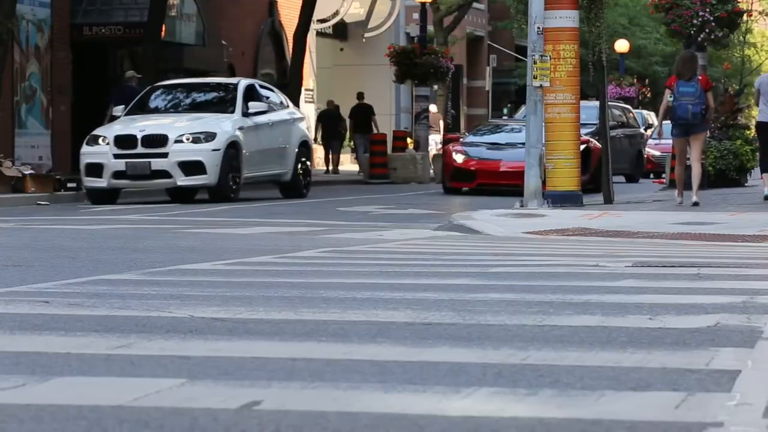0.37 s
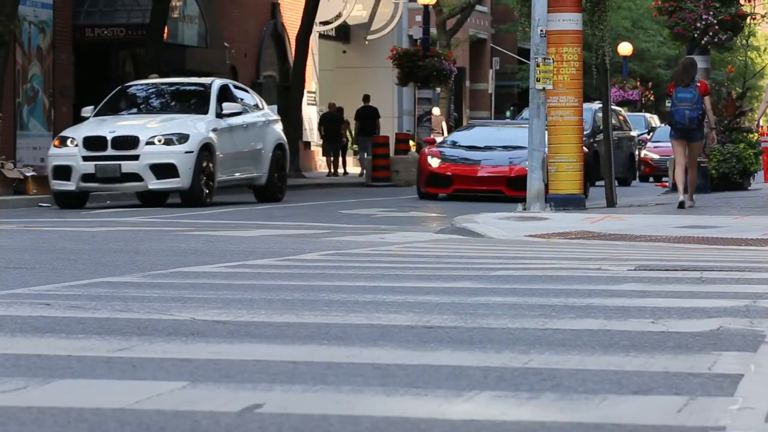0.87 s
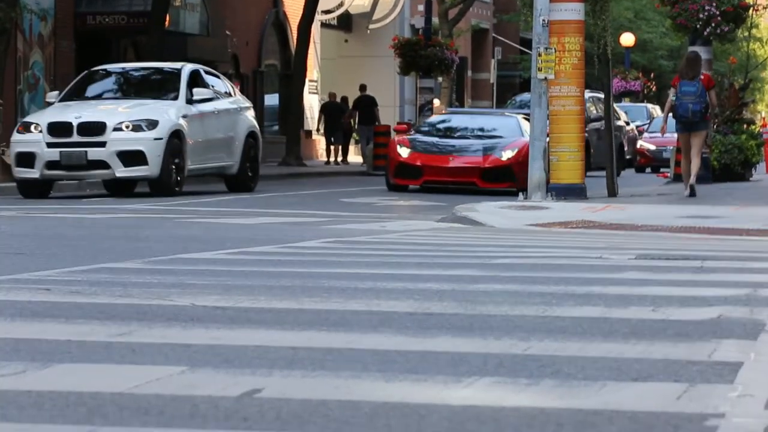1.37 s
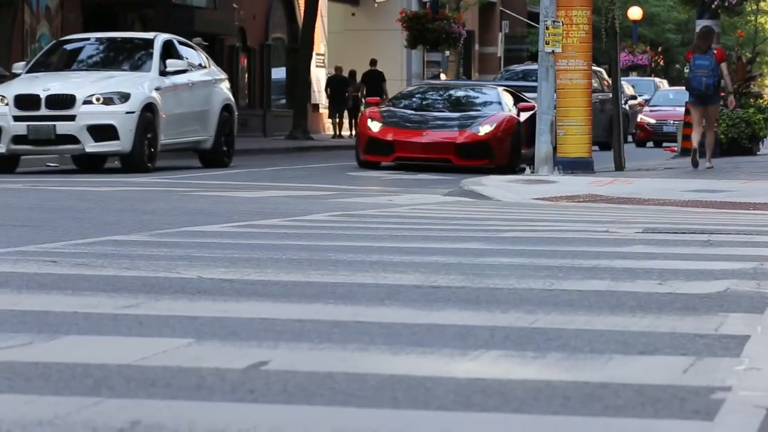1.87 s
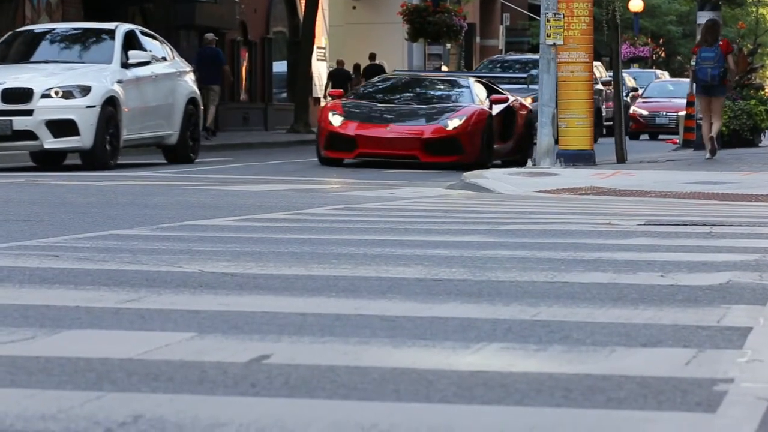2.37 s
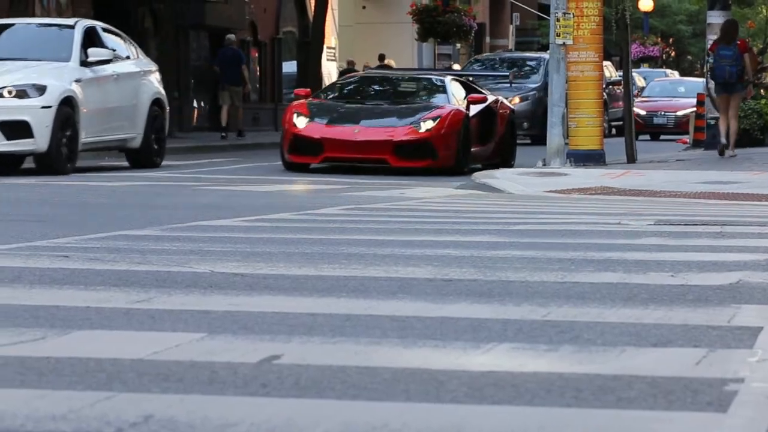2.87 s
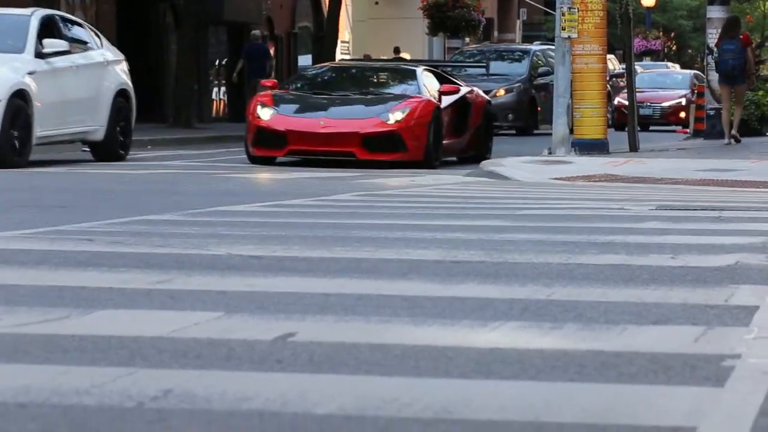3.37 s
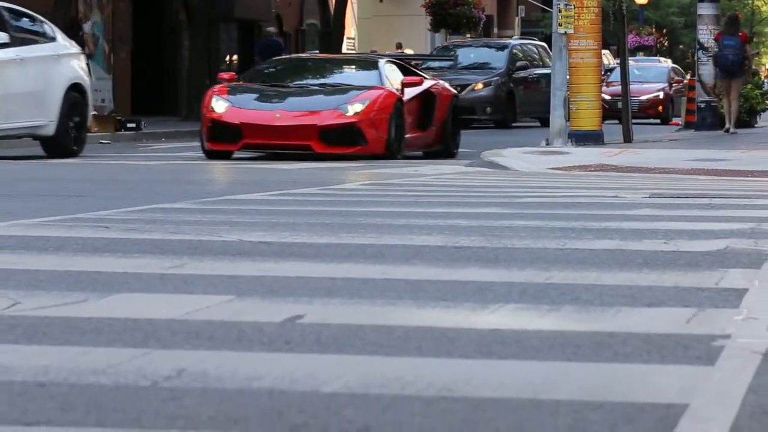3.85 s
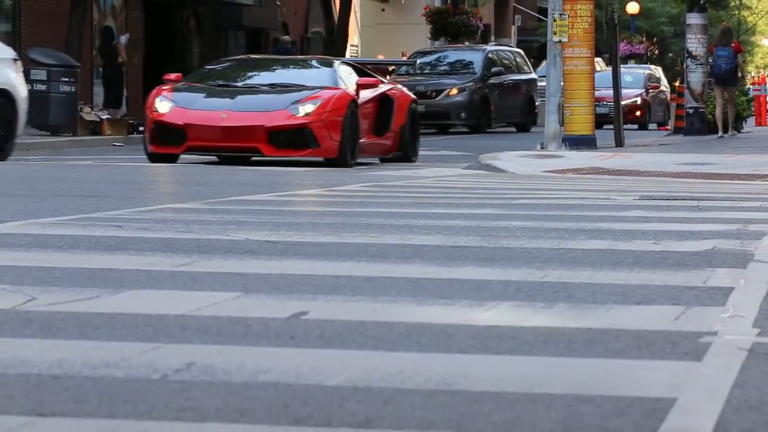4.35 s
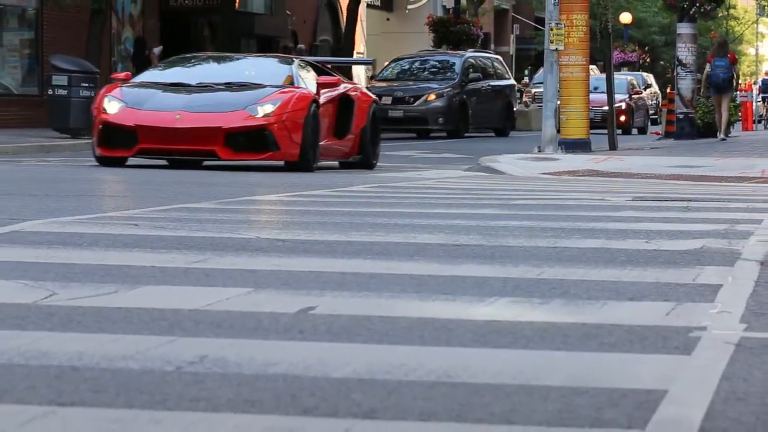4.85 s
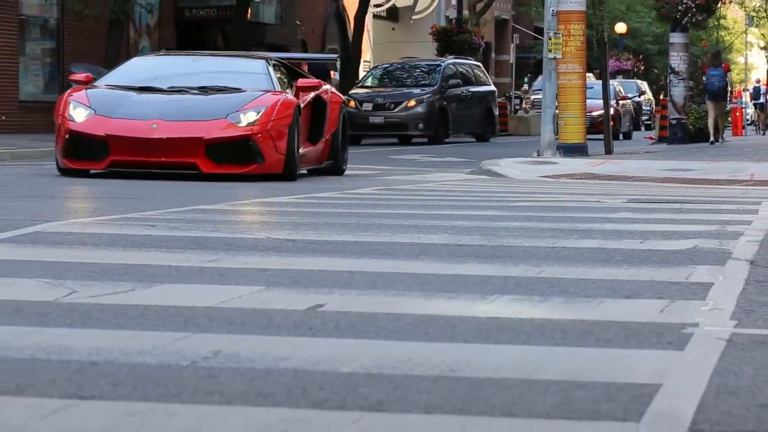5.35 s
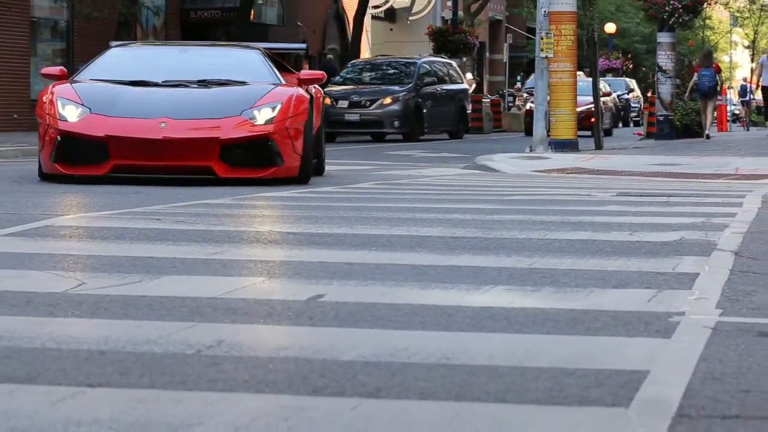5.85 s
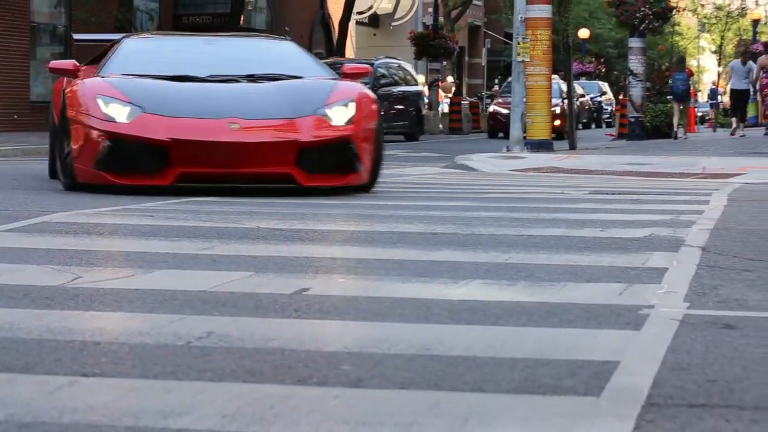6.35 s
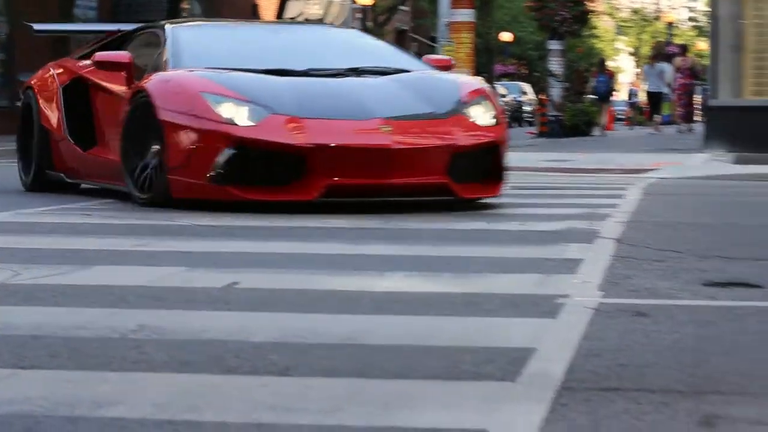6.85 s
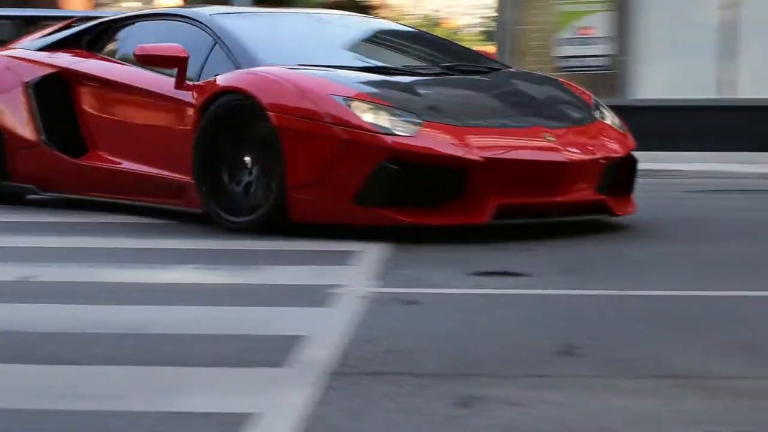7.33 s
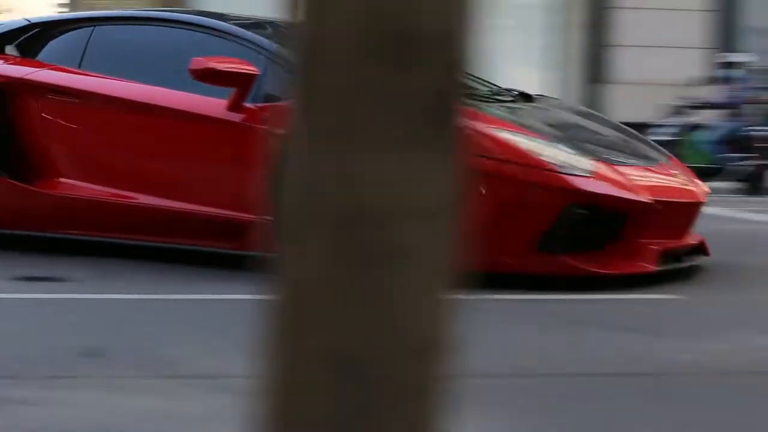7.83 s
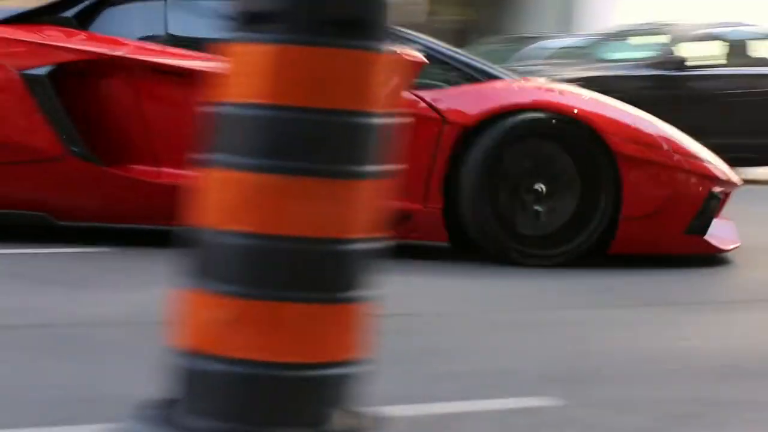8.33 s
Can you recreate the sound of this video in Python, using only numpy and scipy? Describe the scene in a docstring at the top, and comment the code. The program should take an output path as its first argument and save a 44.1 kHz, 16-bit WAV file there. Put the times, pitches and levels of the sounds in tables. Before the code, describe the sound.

A big engine approaches one outdoor microphone: a single dominant low hum with uneven, pulsing loudness, faint growling overtones and broad street roar behind. Automatic levelling pushes the street down whenever the boom swells. The note wobbles at first, sags slightly, then climbs gradually. In the last seconds upper overtones and tyre noise come forward, the boom surges, then weakens abruptly as the sound stops with no fade.

```python
"""Sports car rounding a street corner

A big engine pulls slowly towards the microphone. Sines on multiples of the firing pattern make its note:
one booms in the pipe and wavers as wall echoes add and cancel, weaker ones come and go.
Patchy coloured noise makes rumble, burble, street roar and tyre hiss; a few small ticks are damped sines.
The sound fades in, and gain control on the whole mix ducks the street when the boom swells."""
import sys
import numpy as np
from scipy import signal
from scipy.fft import rfft, irfft, next_fast_len
from scipy.io import wavfile
from scipy.ndimage import uniform_filter1d, map_coordinates

SR = 44100
rng = np.random.default_rng(int(sys.argv[2]) if len(sys.argv) > 2 else 0)


def transcribe(signal):
    """Save signal, clipped to [-1, 1], as a 16-bit WAV file at the path in sys.argv[1]."""
    frames = np.atleast_2d(signal).T
    limited = np.clip(frames, -1, 1)
    pcm = np.round(limited * 32767).astype(np.int16)
    wavfile.write(sys.argv[1], SR, pcm)


def voltage_ratio(decibels):
    """Convert decibels (scalar or array-like) to amplitude ratios, 20 dB per decade."""
    exponent = np.asarray(decibels, float) / 20
    return 10 ** exponent


N = 373086  # length in samples

# The engine's pull. Each row: time in seconds, firing pattern rate in Hz.
FIRING_RATE = [(.3, 41.3), (.6, 42.53), (.9, 44.1), (1.25, 44.4), (1.5, 43.45), (1.75, 44.6), (2, 43.09),
               (2.5, 42.36), (2.9, 41.95), (3.15, 42.61), (3.45, 42.07), (3.95, 44.26), (4.55, 45.8),
               (5.3, 47.42), (5.9, 49.02), (6.5, 49.7), (6.95, 49.4), (7.5, 50.84), (8.05, 52.5),
               (8.46, 54.22)]
# The 4th harmonic, on the pipe's resonance. Each row: time in seconds, level in dB before waver and dips.
BOOM_LEVEL = [(0.35, -8.5), (0.87, -4), (1.15, -3.5), (1.36, -11), (1.96, -6), (2.15, -8.5), (2.69, -16),
              (3.06, -10), (3.62, -6.5), (3.81, -13), (4.16, -9.5), (4.66, -9), (4.94, -4.5), (5.38, -13.5),
              (5.62, -6.5), (5.98, -7.5), (6.38, -6.5), (6.75, -11.5), (7.27, -15), (7.6, -8), (8.24, -1.0),
              (8.46, -12.5)]
# Brief dips in the boom. Each row: centre in seconds, depth in dB, half width in seconds.
BOOM_DIPS = [(0.417, 11, 0.021), (0.574, 8, 0.06), (0.96, 4, 0.051), (1.41, 2.9, 0.0094),
             (1.688, 14, 0.0834), (1.823, 12, 0.053), (1.947, 11.5, 0.053), (2.176, 6, 0.092),
             (2.422, 10.5, 0.08), (2.52, 6, 0.018), (2.86, 6, 0.0392), (3.141, 3.5, 0.058),
             (3.372, 5.5, 0.07), (3.523, 16.5, 0.0541), (3.64, 11.8, 0.048), (3.938, 3, 0.064),
             (4.185, 8, 0.097), (4.364, 6.5, 0.042), (4.549, 3.7, 0.041), (4.808, 7, 0.0149),
             (4.985, 8, 0.0813), (5.127, 4.9, 0.043), (5.282, 12, 0.042), (5.503, 6.5, 0.036),
             (5.668, 5, 0.057), (5.855, 8, 0.09), (6.112, 6.5, 0.026), (6.73, 4.5, 0.039),
             (6.806, 2, 0.018), (6.907, 14.5, 0.041), (7.058, 19, 0.029), (7.387, 10.5, 0.037),
             (7.68, 7, 0.038), (7.824, 1, 0.0846), (8.233, 7.5, 0.034)]
# The other strong harmonics. Each row: time in seconds, then 3rd, 8th, 9th and 12th harmonic in dB
# before waver.
GROWL_LEVELS = [(.3, -29, -42, -40, -51.5), (.7, -37, -43.5, -46, -45), (1.25, -22, -42, -38, -47),
                (1.6, -32.5, -40, -34, -46), (1.8, -33, -44, -23.5, -32), (2, -38, -43.5, -37, -39),
                (2.3, -35, -35, -32, -36.5), (3.1, -30, -41, -44, -50), (4.1, -27, -43, -32.5, -52),
                (4.8, -30.5, -36, -29, -43), (5.4, -30.5, -28, -30, -45), (6.1, -31.5, -28.5, -37.5, -49),
                (6.55, -29.5, -26, -29.5, -33), (7, -31, -29, -30.5, -36), (7.5, -33, -22, -39, -34.5),
                (8, -34, -19.5, -29.5, -29.5), (8.46, -41.5, -16, -29, -30.5)]
# Faint harmonics that ride with the street. Each row: multiple of the firing pattern,
# starting level in dB relative to the street level, rise in dB per second as the car nears.
FAINT_HARMONICS = [(1, -8.5, -2), (2, -13, 0.77), (5, -7.5, -0.35), (6, -12, -0.36), (7, -9, -1.13),
                   (10, -13, 0.1), (11, -18, .5), (16, -22, 0.36), (19, -29.5, 1.6)]
# The street's balance. Each row: time in seconds, street level in dB, rumble in dB relative to it,
# burble in dB relative to it, tyre hiss in dB.
STREET_LEVELS = [(.3, -25.5, 4, 6.5, -46), (.6, -28.5, -0.5, 6, -49.5), (.9, -27, 2, 0, -47),
                 (1.3, -24.5, 1.5, 3.5, -45), (1.75, -27, 6.5, 5, -48.5), (2.3, -30, -1.5, 2.5, -52),
                 (3, -28, -1, 2, -48.5), (3.7, -28, -1.5, 3, -47.5), (4.4, -29.5, -4, 1, -46.5),
                 (5.2, -32, -1, 3, -49), (5.5, -32.5, 0, 3, -48.5), (6.1, -31.5, -1, 2, -51),
                 (7.03, -30.5, -3, 2, -49), (7.22, -33.5, -4, 6.5, -51), (7.42, -31, -7, 3, -47.5),
                 (7.52, -34, -4, 2, -49), (7.8, -30, -5.5, 8, -43), (8.2, -28, -5.5, 6, -45),
                 (8.46, -27, -5, 5.5, -42)]
# Noise colours, relative levels only. Each row: frequency in Hz, density in dB per Hz.
RUMBLE_COLOUR = [(10, -30), (30, -20.5), (55, -11.5), (80, -6), (120, -3.5), (170, -2), (260, -30)]
BURBLE_COLOUR = [(110, -25.5), (170, -1), (240, -1.5), (300, -2), (345, -5), (400, -0.5), (460, -7.5),
                 (600, -22.5), (800, -42.5)]
ROAR_COLOUR = [(280,-19.5), (480,-5.5), (611,-5), (741,-7.5), (1030,-7.5), (2490,-16.5), (2770,-19.5),
               (3230,-18.5), (4600,-28), (6000,-39.5), (9000,-66)]
HISS_COLOUR = [(3500, -14.5), (5000, -5), (5900, -4.5), (6800, -2), (8500, -5.5), (10000, -10.5),
               (12000, -17), (14000, -27.5), (15800, -31.5)]
# Small ticks. Each row: start in seconds, level in dB before the soft onset, pitch in Hz,
# time to decay by 60 dB in seconds.
TICK_RINGS = [(.7, -42, 7500, .09), (3.670, -39, 12620, .07), (4.183, -16, 4700, .0035),
              (4.192, -22, 3100, .025), (5.405, -43, 6800, .09)]
# Gain control, one row: loudest level in dB, detector window in seconds, attack in seconds,
# recovery in dB per second.
GAIN_CONTROL = (-12, 0.0483, 0.06, 11)
# Fade-in, one row: start in seconds, end in seconds, curve power.
FADE_IN = (0.064, 0.44, 2.04)


def unit(x):
    """Scale to rms 1."""
    return x / np.sqrt(np.mean(x ** 2) + 1e-20)


def curves(rows):
    """One value per sample for each column after the time."""
    seconds, *columns = np.transpose(rows)
    return [np.interp(np.arange(N) / SR, seconds, column) for column in columns]


def wobble(rate):
    """A smooth random curve, rate knots a second."""
    knots = rng.standard_normal(int(N * rate / SR) + 4)
    return map_coordinates(knots, [np.arange(N) * rate / SR])


def rush(colour, patchy_db):
    """Coloured noise of rms 1, with smooth patches of random gain over time and frequency."""
    grains = signal.stft(rng.standard_normal(N + 512), nperseg=512)[2]
    field = uniform_filter1d(rng.standard_normal(grains.shape), size=6, axis=0)
    field = uniform_filter1d(field, size=12, axis=1)
    noise = signal.istft(grains * voltage_ratio(patchy_db * unit(field)), nperseg=512)[1][:N]
    size = next_fast_len(N + 8192)
    hz, db = np.transpose(colour)
    bins = np.log(np.fft.rfftfreq(size, 1 / SR) + 1)
    gain = voltage_ratio(np.interp(bins, np.log(hz + 1), db, left=-120, right=-120))
    return unit(irfft(rfft(noise, size) * gain, size)[:N])


def harmonic(turn, multiple, db, waver_db, jitter):
    """One multiple of the firing pattern; echoes make level and phase waver, slowly and fast."""
    drift = jitter * (wobble(12) + 0.4 * wobble(40))  # radians
    phase = multiple * turn + drift + rng.uniform(0, 2 * np.pi)
    level_db = db + waver_db * (wobble(9) + 0.67 * wobble(24))
    return np.sqrt(2) * voltage_ratio(level_db) * np.sin(phase)


def boom(turn):
    """The 4th harmonic builds up over the first 0.4 seconds, then dips briefly many times."""
    t = np.arange(N) / SR
    build = np.clip(t / 0.382, 0, 1) ** 2.3
    dips = np.ones(N)
    for centre, depth_db, half_width in BOOM_DIPS:
        dips *= 1 - (1 - voltage_ratio(-depth_db)) * np.exp(-((t - centre) / half_width) ** 2)
    level_db, = curves(BOOM_LEVEL)
    return build * dips * harmonic(turn, 4, level_db, waver_db=1.11, jitter=0.33)


def growl(turn):
    """The boom's strong companions, each with its own level curve."""
    levels_db = curves(GROWL_LEVELS)
    return sum(harmonic(turn, multiple, db, waver_db=2.1, jitter=0.4)
               for multiple, db in zip((3, 8, 9, 12), levels_db))


def faint_harmonics(turn, street_db):
    """The rest of the series follows the street level, each tilting steadily as the car nears."""
    t = np.arange(N) / SR
    return sum(harmonic(turn, round(multiple), street_db + db + rise * t, waver_db=2.4, jitter=0.3)
               for multiple, db, rise in FAINT_HARMONICS)


def exhaust(street_db):
    """All harmonics share one running phase, so they stay on multiples of the firing pattern."""
    hz, = curves(FIRING_RATE)
    turn = 2 * np.pi * np.cumsum(hz) / SR
    return boom(turn) + growl(turn) + faint_harmonics(turn, street_db)


def traffic_rumble(db):
    """Low noise whose level wanders."""
    return voltage_ratio(db + 2.5 * wobble(7)) * rush(RUMBLE_COLOUR, patchy_db=1.0)


def exhaust_burble(db):
    """Low-mid noise that swells and sinks a little faster than the rumble."""
    return voltage_ratio(db + 1.6 * wobble(8.2)) * rush(BURBLE_COLOUR, patchy_db=1.2)


def road_roar(swell):
    """Broad noise whose upper part grows as the car nears, a first-order shelf pivoting at mid-scene."""
    brighten_hz, brighten_db_per_s = 1900, 0.38
    roar = voltage_ratio(2.0 + 0.5 * swell) * rush(ROAR_COLOUR, patchy_db=0.74)
    highpass = signal.butter(1, brighten_hz, 'high', fs=SR, output='sos')
    upper = signal.sosfilt(highpass, roar)
    upper_gain = voltage_ratio(brighten_db_per_s * (np.arange(N) - N / 2) / SR)
    return roar + (upper_gain - 1) * upper


def tyre_hiss(db, swell):
    """High noise that shares the roar's quick swells and adds some of its own."""
    return voltage_ratio(db + 0.52 * swell + 0.26 * wobble(18)) * rush(HISS_COLOUR, patchy_db=1.04)


def street(street_db, rumble_db, burble_db, hiss_db):
    """Rumble, burble and roar move on one street level; the hiss keeps its own."""
    swell = wobble(11)
    body = traffic_rumble(rumble_db) + exhaust_burble(burble_db) + road_roar(swell)
    return voltage_ratio(street_db) * body + tyre_hiss(hiss_db, swell)


def ticks():
    """Short damped sines with a soft onset: thin high squeaks and grit clicks."""
    out = np.zeros(N + SR)
    t = np.arange(SR // 10) / SR
    for start, db, hz, t60 in TICK_RINGS:
        onset = 1 - np.exp(-8 * t / t60)
        ring = voltage_ratio(db - 60 * t / t60) * np.sin(2 * np.pi * hz * t)
        out[round(start * SR):][:len(t)] += ring * onset
    return out[:N]


def levelled(x):
    """Gain drops quickly when the sound passes the loudest level and climbs back at a steady rate."""
    top_db, detector_s, attack_s, recovery = GAIN_CONTROL
    power = np.abs(uniform_filter1d(x ** 2, round(detector_s * SR)))
    level_db = 10 * np.log10(power + 1e-12)
    needed_db = np.minimum(top_db - level_db, 0)
    climb = recovery * np.arange(N) / SR
    gain_db = climb + np.minimum.accumulate(needed_db - climb, axis=-1)
    attack = round(attack_s * SR)
    # the offset makes the average look back only
    return x * voltage_ratio(uniform_filter1d(gain_db, attack, origin=attack // 2 - 1))


def scene():
    """Engine, street and ticks at one microphone."""
    street_db, *others_db = curves(STREET_LEVELS)
    mix = exhaust(street_db) + street(street_db, *others_db) + ticks()
    return mix[None]


def roll_off(x):
    """The treble ends steeply here."""
    return signal.sosfilt(signal.butter(12, 15720, fs=SR, output="sos"), x)


def record(dry):
    """Gain control rides the mix, a soft ceiling rounds the loudest crests and the level fades in."""
    start, end, power = FADE_IN
    fade = np.clip((np.arange(N) / SR - start) / (end - start), 0, 1) ** power
    even = levelled(dry)
    rounded = even / (1 + np.abs(even / 0.66) ** 8) ** (1 / 8)
    return roll_off(rounded * fade)


dry = scene()
out = record(dry)
transcribe(out)
```